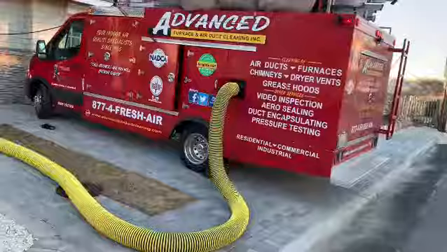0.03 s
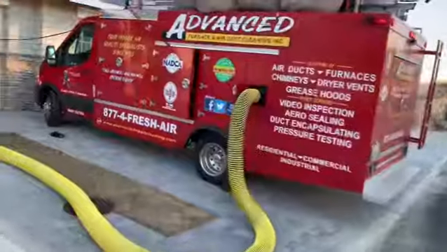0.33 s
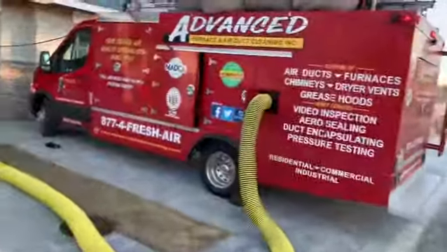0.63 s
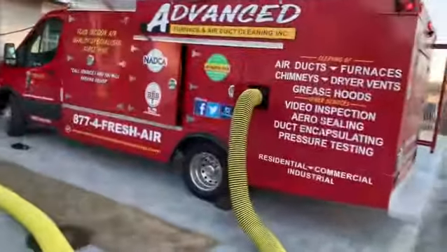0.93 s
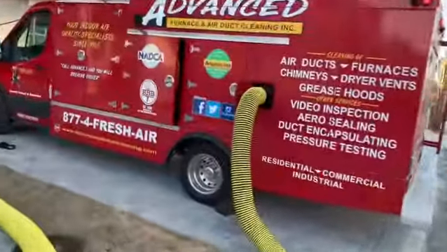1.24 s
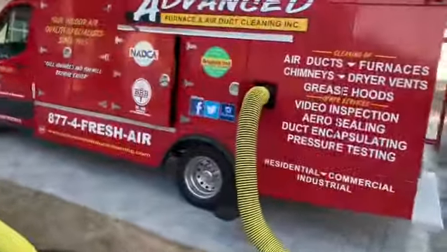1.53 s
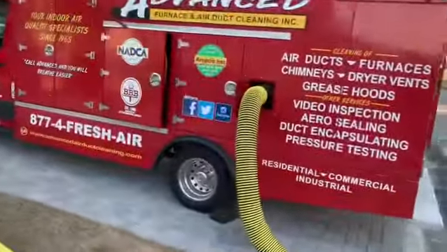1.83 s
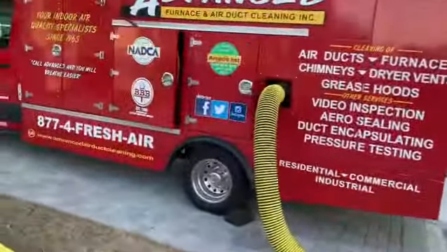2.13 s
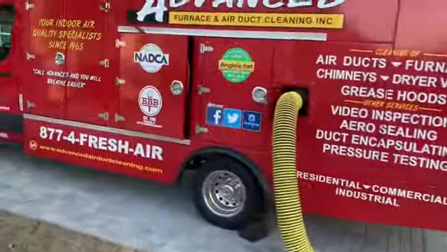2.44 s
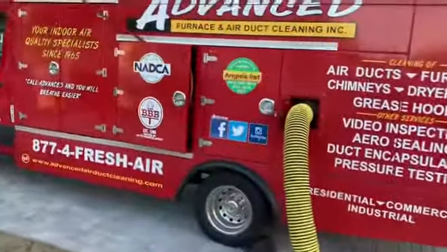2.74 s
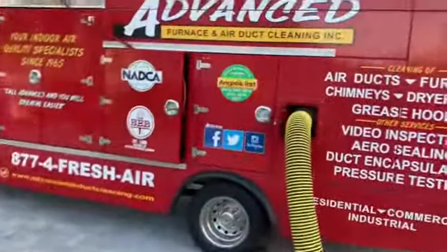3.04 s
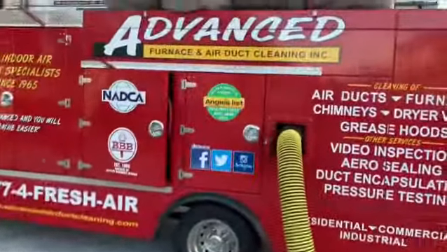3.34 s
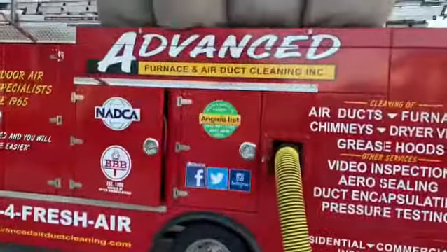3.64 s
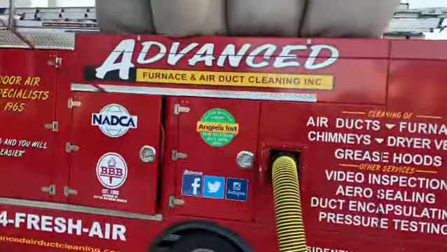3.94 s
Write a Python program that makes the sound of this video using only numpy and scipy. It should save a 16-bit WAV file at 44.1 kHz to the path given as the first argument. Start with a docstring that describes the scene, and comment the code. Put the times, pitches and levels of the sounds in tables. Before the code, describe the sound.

Outdoors, a parked vacuum truck gives off a continuous blower roar and engine drone, with faint wavering whistles on top. The engine keeps one speed, its hum growing stronger as the listener walks up to the side.

```python
"""An engine drone and a roar of air: a vacuum truck runs outdoors as the listener walks up to its side.
The engine holds a governed speed, its exhaust note swelling on approach over throbbing turbulence.
Its belt pulls unevenly on a whining fan and a ten-bladed blower; a cluster of close whistles
beats in the blower housing. Sources are (mid, side) pairs, mixed to left and right."""
import sys
import numpy as np
from scipy import signal
from scipy.fft import rfft, irfft, next_fast_len
from scipy.io import wavfile
from scipy.ndimage import uniform_filter1d, minimum_filter1d, map_coordinates

SR = 44100
rng = np.random.default_rng(int(sys.argv[2]) if len(sys.argv) > 2 else 0)


def digitize_waveform(pressure):
    """Quantize a signal to 16-bit integers and store it at the path in sys.argv[1].

    Rows of a 2-D input are taken as channels; values are limited to [-1, 1].
    """
    field = np.atleast_2d(pressure).T
    bounded = np.clip(field, -1, 1)
    quanta = np.round(bounded * 32767).astype(np.int16)
    wavfile.write(sys.argv[1], SR, quanta)


N = 176400

FADE_DB, FADE_HZ = 1, 2.382  # slow fading of tones
JITTER_HZ, BELT_FLUTTER = 9, 0.00059  # speed unsteadiness: rate, fraction

# side relative to mid (frequency [Hz], gain [dB])
SIDE_DB = [(60, -25), (300, -25), (550, -16), (960, -12.5), (1670, -0.5), (2900, -1.5)]
# air roar; the clatter follows it (time [s], level [dB])
ROAR_LEVEL_DB = [(.1, -28.5), (1.35, -27), (2.1, -32), (4, -33)]


def amp(db):
    """Decibels to gain."""
    return 10 ** (np.asarray(db) / 20)


def unit(x):
    """Scale to rms 1."""
    return x / np.sqrt(np.mean(x ** 2) + 1e-20)


def along(points, hz):
    """Interpolate (Hz, value) points on a log axis."""
    knots_hz, values = np.transpose(points)
    return np.interp(np.log(hz + 1), np.log(knots_hz + 1), values)


def response(points):
    """(Hz, dB) points to a gain function of frequency."""
    return lambda hz: amp(along(points, hz))


def curve(points):
    """(s, value) points to one value per sample."""
    return np.interp(np.arange(N) / SR, *np.transpose(points))


def wobble(rate_hz):
    """Smooth random curve, rate_hz knots a second."""
    coarse = np.arange(0, N + 64, 64)
    spline = map_coordinates(rng.standard_normal(1024), [coarse * rate_hz / SR], mode="wrap")
    return np.interp(np.arange(N), coarse, spline)


def filtered(x, gain):
    """Zero-phase filter by gain(hz)."""
    size = next_fast_len(N + 8192)
    return irfft(rfft(x, size) * gain(np.fft.rfftfreq(size, 1 / SR)), size)[..., :N]


def noise(gain):
    """Coloured noise, rms 1."""
    return unit(filtered(rng.standard_normal(N), gain))


def rush(spectrum_db):
    """Mid and side noise; treble wider than bass."""
    gain = response(spectrum_db)
    return np.array([noise(gain), filtered(noise(gain), response(SIDE_DB))])


def resonance(centre_hz, width_hz):
    """Steep-sided noise band; the centre may move."""
    phase = 2 * np.pi * np.cumsum(centre_hz * np.ones(N)) / SR
    shape = lambda hz: 1 / np.sqrt(1 + (2 * hz / width_hz) ** 4)
    mid, side = [noise(shape) * np.cos(phase) + noise(shape) * np.sin(phase) for _ in range(2)]
    return np.array([mid, side * amp(along(SIDE_DB, np.mean(centre_hz)))])


def turns(speed_hz, flutter):
    """Cycle count of a slightly unsteady rotation."""
    return np.cumsum(speed_hz * (1 + flutter * wobble(JITTER_HZ))) / SR


def tone(cycles, level_db, fade_db=FADE_DB, spread_rad=0.9):
    """Mid and side of one partial, fading as reflections shift."""
    phase = 2 * np.pi * (cycles + rng.random())
    mean_hz = cycles[-1] * SR / N
    side = amp(along(SIDE_DB, mean_hz)) * np.cos(phase + spread_rad * wobble(FADE_HZ))
    return np.sqrt(2) * amp(level_db + fade_db * wobble(FADE_HZ)) * np.array([np.sin(phase), side])


def blade_tones(passes, partials):
    """Blade-rate harmonics; their balance shifts on approach."""
    # approach (time [s], nearness [0 far, 1 near])
    approach = [(1.1, 0.13), (2.3, 0.53), (4, 0.96)]
    nearness = curve(approach)
    return sum(tone(round(k) * passes, far + nearness * (near - far)) for k, far, near in partials)


def exhaust_noise(cycles):
    """Rumble under turbulence that throbs once a cycle; reflections hollow it into moving peaks."""
    # spectra (frequency [Hz], relative density [dB])
    rumble_spectrum = [(10, -38), (28, -12), (44, 3.5), (65, 0.5), (120, -3.5), (280, -120)]
    drone_spectrum = [(50, -120), (100, -16), (135, -2.5), (175, 7.5), (215, 0), (310, -6.5), (400, -15),
                      (600, -120)]
    # envelopes (time [s], level [dB])
    rumble_db = [(.15, -20), (4, -31)]
    drone_db = [(.1, -23.5), (.8, -19), (1.6, -16), (2.6, -22.5), (4, -20.5)]
    boom_db = [(.1, -16.5), (.8, -17.5), (1.5, -22), (2.2, -24.5), (3.1, -28), (3.8, -23.5)]
    hollow_db = [(.1, -35), (.8, -28.5), (1.75, -28.5), (2.15, -37), (3.4, -29)]
    # lower and upper peak (time [s], centre [Hz])
    boom_hz = [(.1, 301.5), (.5, 254), (1.3, 239.9), (2.2, 179), (4, 140.1)]
    hollow_hz = [(.1, 519.5), (.8, 495), (1.5, 425), (2.3, 405), (2.6, 541.5), (4, 512)]
    throb = unit(1 + 0.082 * np.sin(2 * np.pi * cycles))
    drone = amp(curve(drone_db) + 1.5) * rush(drone_spectrum)
    boom = amp(curve(boom_db)) * resonance(curve(boom_hz), width_hz=60.4)
    hollow = amp(curve(hollow_db)) * resonance(curve(hollow_hz), width_hz=62)
    rumble = amp(curve(rumble_db) - 0.5) * rush(rumble_spectrum)
    return throb * (drone + boom + hollow) + rumble


def airflow(cycles):
    """Roar pulsing with the crankshaft, under a wide hiss."""
    # spectra (frequency [Hz], relative density [dB])
    roar_spectrum = [(200, -120), (330, -16.5), (430, 1.5), (600, -2.5), (900, -8.5), (1350, -11),
                     (1650, -18), (2400, -16), (2800, -33), (3600, -120)]
    hiss_mid = [(1500, -120), (2400, -14.5), (2950, 7.5), (3150, -1), (3500, 3), (5700, -4), (7000, -1),
                (8500, 2.5), (9400, -11), (9900, -120)]
    hiss_side = [(1500, -120), (2400, -14), (3000, 15), (3800, -2), (5500, 1.5), (7300, -17), (8500, -4),
                 (10800, -3), (11600, -12)]
    # hiss envelope (time [s], level [dB])
    hiss_db = [(.15, -42.5), (1.2, -41.5), (2.3, -46), (4, -47)]
    pulse = unit(1 + 0.043 * np.sin(4 * np.pi * cycles) + 0.11 * wobble(130))
    roar = amp(curve(ROAR_LEVEL_DB) + 0.97 * wobble(6.83)) * rush(roar_spectrum)
    hiss = np.array([noise(response(hiss_mid)), amp(3.0) * noise(response(hiss_side))])
    flicker = unit(1 + 0.099 * wobble(160))
    return pulse * roar + flicker * amp(curve(hiss_db)) * hiss


def mottled(x, depth_db=2.5):
    """Mottled roar and hiss: random patches of gain over frequency and time."""
    spectra = signal.stft(x, nperseg=1024)[2]
    patches = uniform_filter1d(rng.standard_normal(spectra.shape[1:]), size=4, axis=0)
    patches = uniform_filter1d(patches, size=18, axis=1)
    return signal.istft(spectra * amp(depth_db * unit(patches)), nperseg=1024)[1][:, :N]


def clatter(cycles, size=4096, below_roar_db=10):
    """Fine mechanical rattle, repeating every engine cycle."""
    # spectrum (frequency [Hz], relative harmonic level [dB])
    spectrum_db = [(400, -40), (800, 0), (1400, 0), (2500, -10), (4500, -40)]
    shapes = rng.standard_normal((2, size))
    repeated = [np.interp(cycles % 1 * size, np.arange(size), shape) for shape in shapes]
    mid, side = [unit(filtered(x, response(spectrum_db))) for x in repeated]
    side = filtered(side, response(SIDE_DB))
    return amp(curve(ROAR_LEVEL_DB) - below_roar_db) * np.array([mid, side])


def fan(speed_hz, lurch_s, passes_per_cycle=15.255):
    """Cooling fan whine; three harmonics come forward in turn."""
    # blade tone (harmonic, far level [dB], near level [dB])
    partials = [(5, -52.5, -57.5)]
    # harmonic envelopes (time [s], level [dB])
    third_db = [(.1, -37), (.7, -52.5), (1.3, -34.5), (2.1, -49.5), (4, -41.5)]
    fourth_db = [(0.098, -56), (1.899, -54.5), (2.3, -39), (2.65, -39), (2.999, -45.5), (4, -43)]
    seventh_db = [(.1, -49), (.9, -49), (1.7, -66), (2.801, -49.5), (4, -60)]
    blade_hz = passes_per_cycle * speed_hz
    passes = turns(blade_hz, BELT_FLUTTER) + blade_hz * lurch_s
    swelling = [(3, third_db), (4, fourth_db), (7, seventh_db)]
    return blade_tones(passes, partials) + sum(tone(k * passes, curve(db)) for k, db in swelling)


def housing(passes, belt_laps):
    """The sixth blade harmonic and its belt sidebands beat in a metal resonance."""
    # whistles (offset [belt rates], relative level [dB])
    sidebands = [(-2, -11), (0, -1), (1, -9), (2, -7), (4, -14)]
    # envelope (time [s], level [dB])
    ring_db = [(.15, -42), (.75, -37.5), (1.05, -44), (1.28, -36.5), (1.55, -48), (1.8, -39), (2.1, -41),
               (2.25, -46), (2.72, -41), (3.12, -41), (4, -43.5)]
    whistles = sum(tone(6 * passes + k * belt_laps, db) for k, db in sidebands)
    ring_noise = amp(-6.5) * resonance(centre_hz=2588, width_hz=150)
    return amp(curve(ring_db)) * (whistles + ring_noise)


def blower(speed_hz, belt_laps, lurch_s, turns_per_cycle=1.4083, blades=10):
    """Impeller unbalance, blade tones that flutter with the belt, and housing whistles."""
    # blade tones (harmonic, far level [dB], near level [dB])
    partials = [(1, -41.5, -34), (2, -39, -54.5), (3, -42.5, -42), (4, -52.5, -58.5), (7, -50, -56.5)]
    # shaft tone and fifth blade harmonic (time [s], level [dB])
    unbalance_db = [(.1, -28.5), (4, -32)]
    fifth_db = [(.1, -47), (.85, -40.5), (1.9, -51), (4, -52.5)]
    shaft_hz = turns_per_cycle * speed_hz
    shaft_turns = turns(shaft_hz, BELT_FLUTTER)
    passes = blades * (shaft_turns + shaft_hz * lurch_s)
    fifth = tone(5 * passes, curve(fifth_db))
    unbalance = tone(shaft_turns, curve(unbalance_db), fade_db=5.5)
    return unbalance + blade_tones(passes, partials) + fifth + housing(blades * shaft_turns, belt_laps)


def engine(cycles):
    """Comb of firing harmonics under the strong exhaust note."""
    # comb (multiple of cycle rate, level [dB])
    partials = [(1, -32), (5, -23.5), (6, -27.5), (7, -32), (8, -35.5), (11, -35.5), (13, -38), (16, -38.5),
                (17, -40.5), (22, -45.5), (23, -39)]
    # exhaust tones (time [s], level [dB])
    note_db = [(.1, -37), (.5, -33), (.85, -23), (1.35, -15), (1.8, -12.5), (2.7, -13.3), (4, -16.8)]
    octave_db = [(.1, -39), (1.6, -44), (3.3, -30), (4, -30.5)]
    overtone_db = [(0.099, -49), (.9, -43), (1.35, -29.5), (1.8, -38), (4, -39)]
    comb = sum(tone(round(k) * cycles, db) for k, db in partials)
    exhaust = [(12, note_db), (24, octave_db), (21, overtone_db)]
    return comb + sum(tone(k * cycles, curve(db), fade_db=1.32) for k, db in exhaust)


def scene():
    """Engine speed drives the machinery; the belt pulls blower and fan unevenly."""
    # governed speed (time [s], engine cycle rate [Hz])
    governed_hz = [(0.1, 30.28), (1.0, 30.25), (1.8, 30.17), (4.0, 30.155)]
    # left over right (frequency [Hz], level [dB])
    balance_db = [(200, -0.7), (550, 0.5), (1000, 4), (1600, 3.5), (2900, -0.5), (5000, -2), (8800, -0.7)]
    speed_hz = curve(governed_hz)
    cycles = turns(speed_hz, flutter=0.0004)
    belt_laps = 0.617 * cycles
    lurch_s = sum(depth_s * np.sin(2 * np.pi * (per_lap * belt_laps + rng.random()))
                  for per_lap, depth_s in [(1, 24e-6), (2, 40e-6)])  # pulley lead and lag
    machines = engine(cycles) + clatter(cycles)
    machines += blower(speed_hz, belt_laps, lurch_s) + fan(speed_hz, lurch_s)
    mid, side = machines + exhaust_noise(cycles) + mottled(airflow(cycles))
    left_right = np.array([mid + side, mid - side])
    return filtered(left_right, lambda hz: amp(np.outer([.5, -.5], along(balance_db, hz))))


def record(dry, start_s=0.1194, top_hz=11700):
    """The sound cuts in abruptly, with peaks limited to full scale and the top band removed."""
    t = np.arange(N) / SR
    gate = np.clip((t - start_s) / 0.0007, 0, 1) * np.clip((N / SR - t) / 0.0022, 0, 1)
    peak_gain = 1 / np.maximum(np.abs(dry).max(axis=0), 1)
    limiter = uniform_filter1d(minimum_filter1d(peak_gain, size=200), size=200)
    return filtered(dry * gate * limiter, lambda hz: hz < top_hz)


dry = scene()
out = record(dry)
digitize_waveform(out)
```